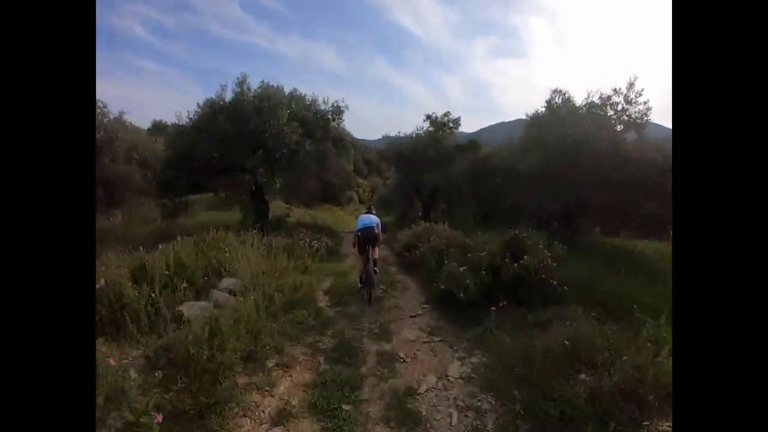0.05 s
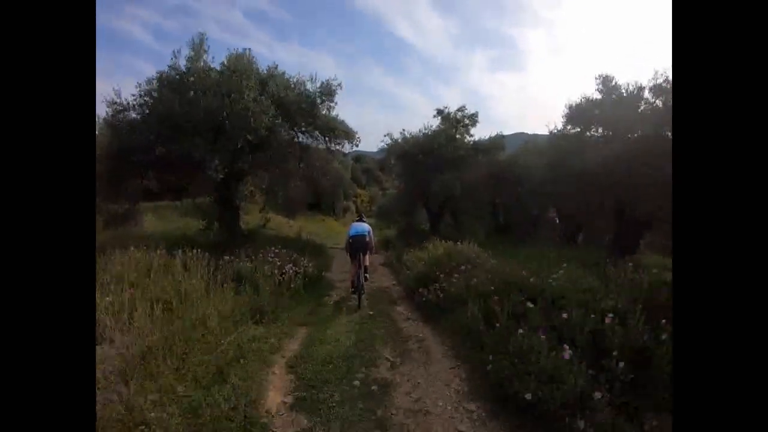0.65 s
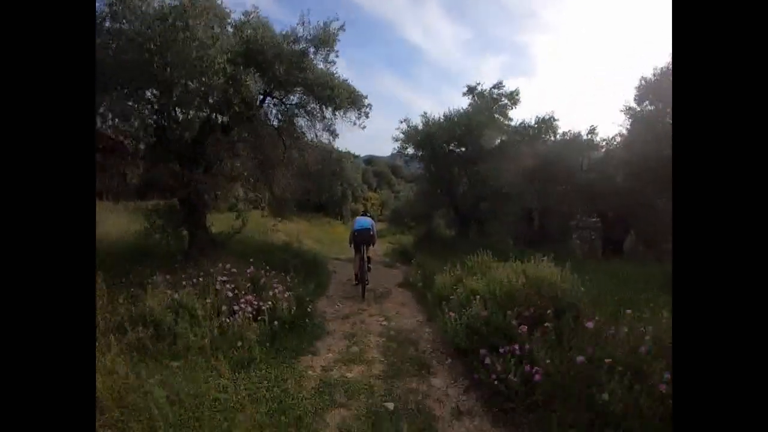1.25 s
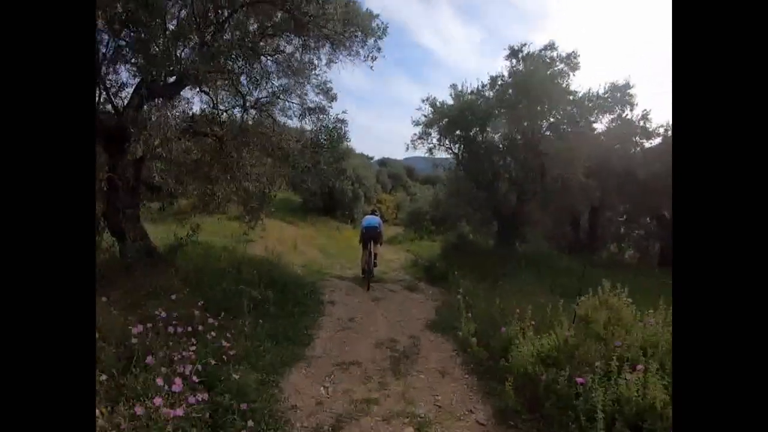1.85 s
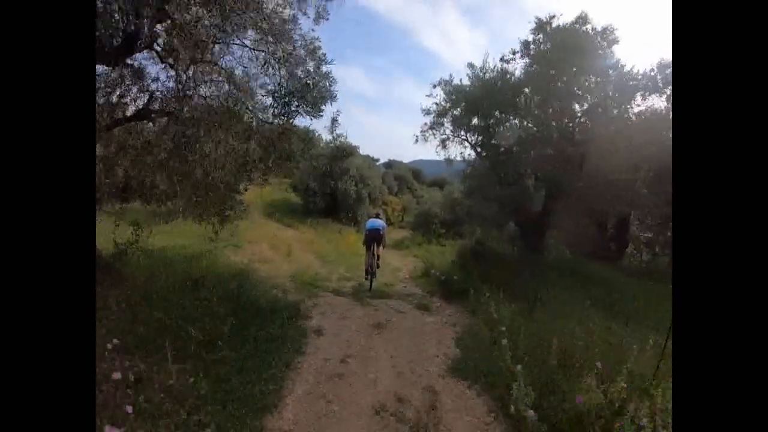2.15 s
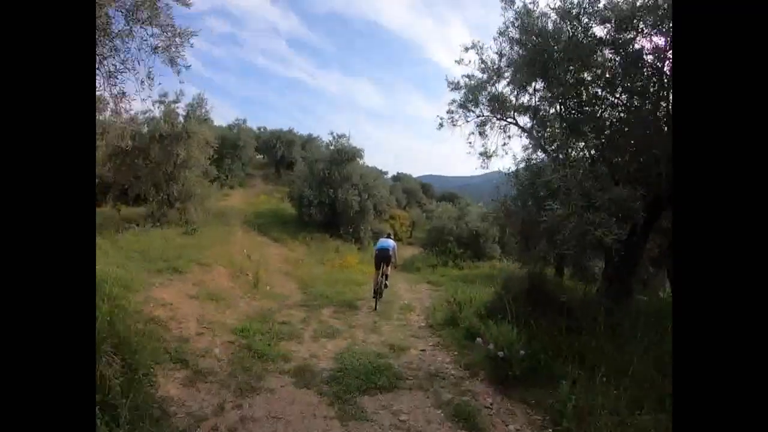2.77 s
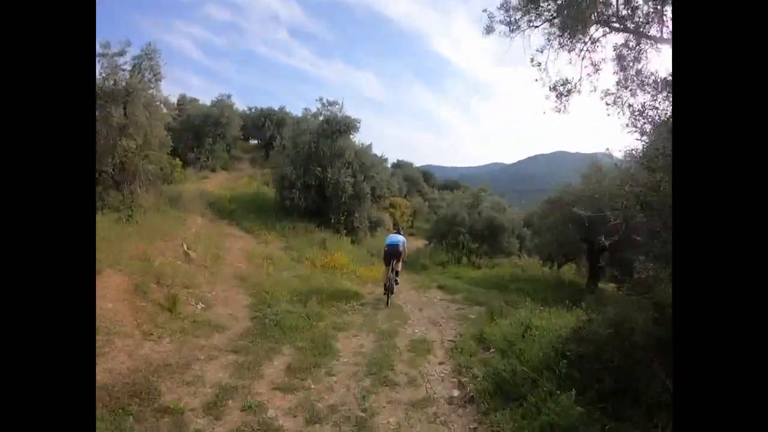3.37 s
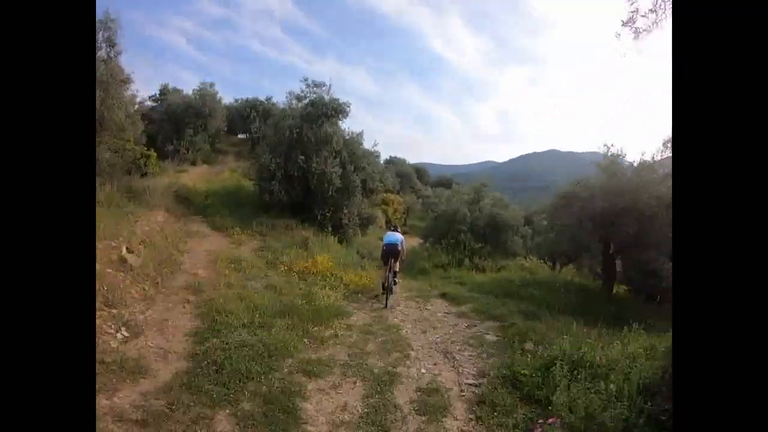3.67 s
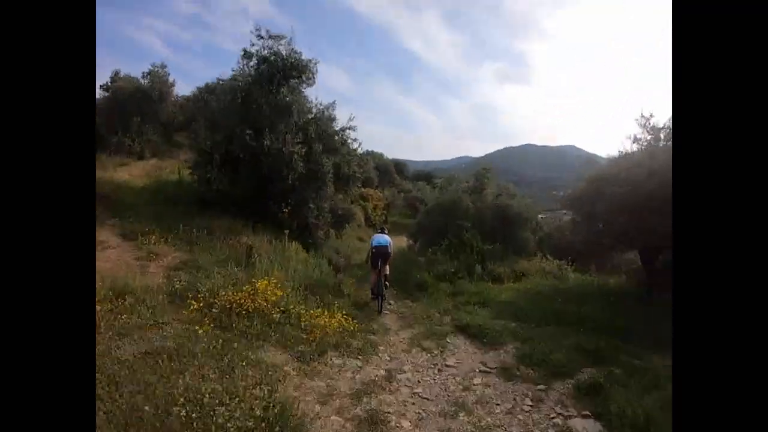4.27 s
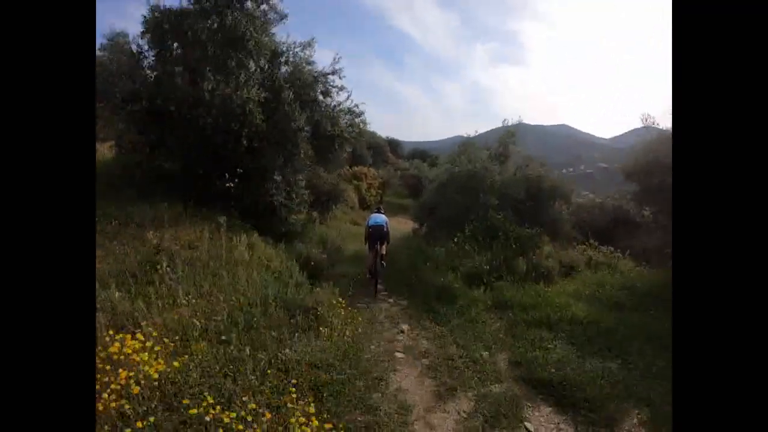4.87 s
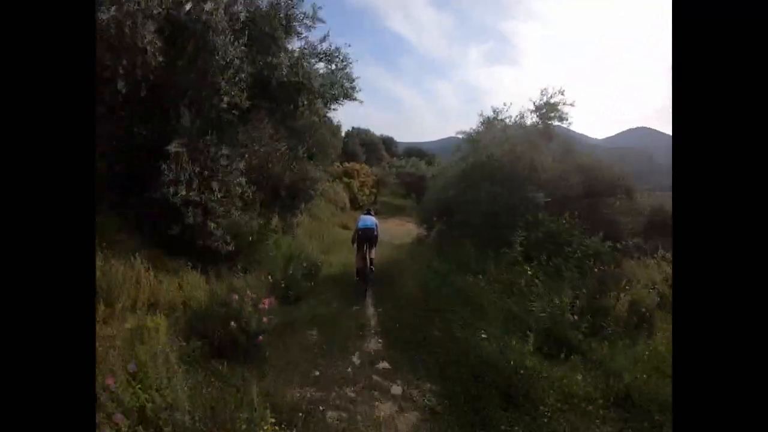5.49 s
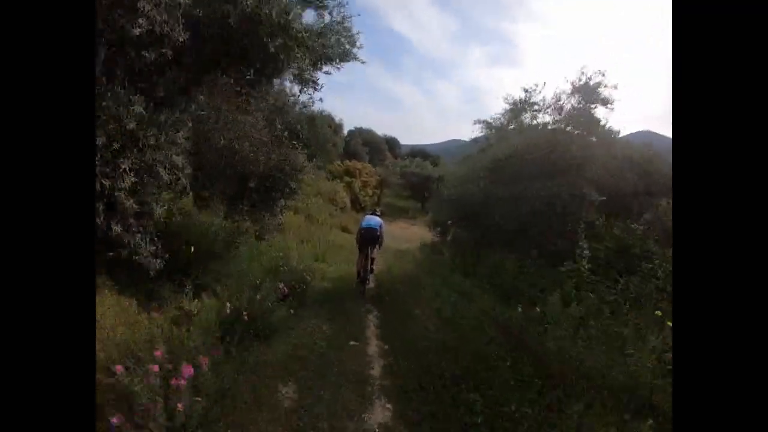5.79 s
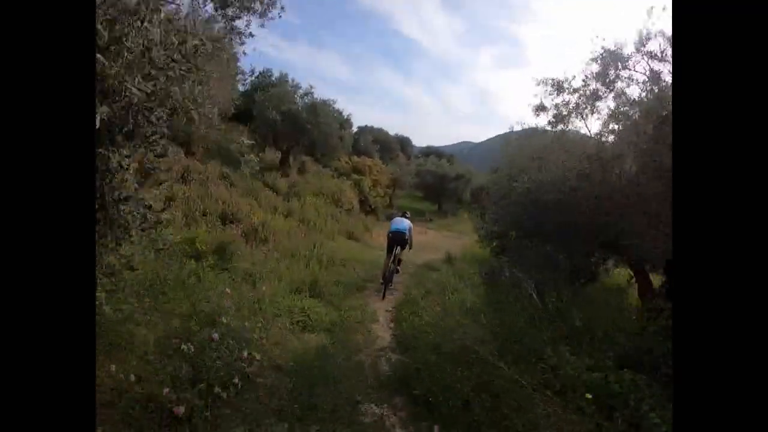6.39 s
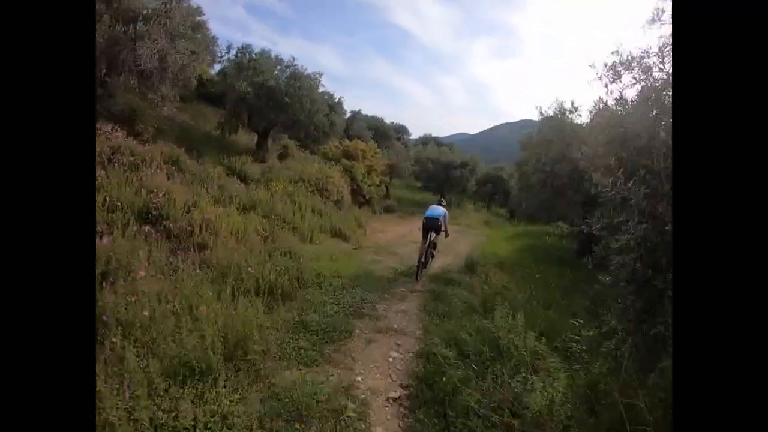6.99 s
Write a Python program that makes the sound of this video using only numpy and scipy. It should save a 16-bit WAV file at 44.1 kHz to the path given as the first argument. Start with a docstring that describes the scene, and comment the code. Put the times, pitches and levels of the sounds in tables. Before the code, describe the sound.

Wind buffets the microphone as bicycle tyres crunch through grit and thud on stones, with sharp knocks from the frame.

```python
"""On a stony dirt track, a rolling bicycle is heard from the rider's seat.
The tyres crunch over grit and thud on stones, spraying gravel; loose parts tick against the frame.
The chain whirrs thinly, the freewheel's pawls buzz briefly, and grass brushes the wheels where the
track narrows. Wind buffets the microphone all the way, a low rumble with a flutter on top."""
import sys
import numpy as np
from scipy import signal
from scipy.fft import rfft, irfft
from scipy.io import wavfile
from scipy.ndimage import uniform_filter1d

SR = 44100
rng = np.random.default_rng(int(sys.argv[2]) if len(sys.argv) > 2 else 0)


def generate_wav(sig):
    """Save sig (samples, or channels by samples) to the path in sys.argv[1] as 16-bit PCM at SR."""
    pcm = np.round(np.clip(np.atleast_2d(sig).T, -1, 1) * 32767).astype(np.int16)
    wavfile.write(sys.argv[1], SR, pcm)


N = 319195
TIME = np.arange(N) / SR

# tyre crunch, louder on stony ground and softer on grass (time [s], level [dB])
CRUNCH_FADER = [(0, -65), (0.25, -67), (0.85, -68), (1.15, -72.5), (1.43, -66.5), (1.82, -70), (2.22, -64),
                (2.55, -66), (2.78, -68.5), (2.97, -66), (3.55, -66.5), (4.22, -66), (4.9, -66.5),
                (5.3, -67.5), (5.78, -64.5), (6.15, -68.5), (6.75, -65), (7.02, -69)]
# hits on large stones (time [s], thud level [dB], spray level [dB], length [s])
BIG_STONES = [(0.476, -59, -53.5, 0.028), (0.524, -52.5, -61.5, 0.021), (1.434, -50, -60.5, 0.021),
              (1.56, -47.5, -71, 0.011), (1.617, -51.5, -56, 0.023), (2.128, -60, -70, 0.033),
              (2.233, -54, -54, 0.02), (2.268, -49, -60, 0.024), (2.326, -50, -58.5, 0.025),
              (2.451, -44, -56.5, 0.025), (2.5, -47.5, -72, 0.06), (2.578, -50, -80, 0.033),
              (3.069, -47.5, -68, 0.017), (3.174, -49.5, -53.5, 0.03), (3.275, -51, -57.5, 0.019),
              (3.338, -60, -56.5, 0.016), (3.372, -51.5, -66, 0.022), (3.409, -48, -53.5, 0.028),
              (3.589, -52, -61, 0.037), (3.661, -45, -53, 0.045), (3.883, -50, -55, 0.048),
              (3.968, -61, -62, 0.024), (4.018, -50, -59.5, 0.017), (4.2, -52, -59, 0.012),
              (4.221, -49.5, -55, 0.037), (4.424, -54, -60.5, 0.049), (4.783, -47, -55.5, 0.031),
              (4.833, -46.5, -54, 0.03), (4.883, -45.5, -54, 0.022), (5.064, -47, -58, 0.028),
              (5.133, -53, -56.5, 0.017), (5.724, -53, -74, 0.014), (5.749, -44.5, -51, 0.031),
              (5.801, -51, -59.5, 0.025), (5.859, -48.5, -54, 0.032), (5.921, -52, -68, 0.018),
              (6.022, -41.5, -50.5, 0.02), (6.095, -44, -49, 0.023), (6.239, -47.5, -54, 0.023),
              (6.304, -51, -57, 0.025), (6.526, -63, -55, 0.027), (6.594, -45.5, -53.5, 0.023),
              (6.66, -52, -63, 0.024)]
# stones and loose parts on the frame (time [s], level [dB], pitch [Hz], relative frame ring [dB])
FRAME_KNOCKS = [(0.041, -38.5, 1560, -14.5), (0.058, -43.5, 2020, -14), (0.286, -39, 2110, -18),
                (0.339, -47, 1860, -13), (0.444, -49.5, 1900, -14), (0.731, -40.5, 1550, -13.5),
                (0.803, -43.5, 2020, -19), (1.019, -43.5, 1280, -35), (1.067, -45, 1980, -16),
                (1.433, -47, 1410, -26), (1.616, -43.5, 1700, -22), (1.811, -43.5, 1800, -24),
                (1.971, -36, 1710, -37), (2.057, -46.5, 1570, -6.5), (2.104, -48, 1510, -24),
                (2.155, -48.5, 2090, -15), (2.341, -43, 1700, -15), (2.389, -45, 1320, -23),
                (2.939, -42.5, 2440, -29), (3.011, -45, 1900, -29), (3.036, -44, 1090, -30),
                (3.155, -49, 1400, -29), (3.194, -49, 1900, -24), (3.373, -38.5, 1780, -25),
                (3.503, -51, 1960, -10), (3.59, -44, 1500, -24), (3.701, -41, 1720, -23.5),
                (3.889, -42, 1860, -19), (3.941, -36.5, 1560, -33), (4.068, -45, 2380, -19),
                (4.206, -33.5, 1350, -29), (4.232, -38, 1980, -27), (4.5, -38, 1510, -13.5),
                (4.56, -41.5, 1960, -18), (4.8, -43, 2300, -28), (4.834, -43, 1420, -22),
                (4.931, -47.5, 1900, -21), (4.959, -41.5, 2500, -16), (4.982, -34, 1240, -25),
                (5.071, -35, 1610, -26), (5.137, -40, 1850, -23), (5.333, -42.5, 1500, -21),
                (5.426, -46, 1540, -11), (5.751, -47, 1200, -18), (5.871, -44, 1160, -22),
                (5.994, -41.5, 2260, -18.5), (6.029, -48, 1600, -11), (6.103, -51, 1690, -22),
                (6.524, -46, 970, -25), (6.68, -29, 980, -41), (6.752, -40, 2080, -36)]
# bright cracks of grit and dry stalks (time [s], level [dB])
SNAP_CUES = [(0.49, -69), (1.334, -66), (3.884, -63), (5.068, -65), (5.137, -63), (5.681, -61.5),
             (6.273, -56), (6.556, -56), (6.679, -62)]
# the rider stops pedalling (time [s], length [s], click rate [1/s], level [dB])
FREEWHEEL_CUES = [(0.113, 0.16, 357, -55.5), (0.44, 0.046, 410, -61)]
# grass against the wheels (time [s], length [s], level [dB])
GRASS_CUES = [(0.0, 0.11, -66.5), (2.56, 0.05, -71), (3.872, 0.044, -69), (5.868, 0.061, -66),
              (6.094, 0.064, -67), (6.262, 0.15, -67), (6.545, 0.14, -68), (6.838, 0.039, -61)]
# whirr of the chain (time [s], level [dB])
CHAIN_FADER = [(0.0, -70.5), (0.8, -76.5), (1.15, -69), (2.1, -69.5), (2.7, -74.5), (6.9, -74.5),
               (7.24, -69)]
# faint, airy high hiss (time [s], level [dB])
HIGH_HISS_FADER = [(0, -90), (1, -96), (2.4, -86.5), (2.8, -91.5), (4.1, -88.5), (4.6, -95.5), (5.3, -93),
                   (6.6, -85.5), (7.24, -88.5)]
# bed of moving air (time [s], large eddies [dB], small eddies [dB])
WIND_FADER = [(0, -50, -56.5), (0.6, -54.5, -57), (1.15, -57, -60.5), (1.75, -58.5, -57), (2.05, -52, -51),
              (2.85, -56.5, -63), (3.45, -55, -52), (4.75, -51.5, -55), (5.5, -50, -58.5),
              (6.5, -52.5, -54), (7.24, -54.5, -59)]
# gusts over that bed (time [s], length [s], large eddies [dB], small eddies [dB])
GUST_CUES = [(0.146, 0.13, -44.5, -45.5), (0.275, 0.049, -52, -42), (0.46, 0.047, -48.5, -51.5),
             (0.69, 0.1, -47.5, -47.5), (0.82, 0.085, -54, -48), (0.935, 0.059, -52, -48),
             (1.075, 0.13, -53, -63), (1.238, 0.062, -50, -57.5), (1.348, 0.048, -47.5, -45.5),
             (2.084, 0.05, -46, -53), (2.382, 0.035, -48, -49.5), (2.664, 0.072, -47.5, -54),
             (2.94, 0.068, -48, -51.5), (3.086, 0.036, -54, -66), (3.315, 0.04, -46.5, -56),
             (3.747, 0.04, -49, -61), (3.946, 0.028, -46, -53), (4.192, 0.18, -46.5, -47),
             (4.428, 0.046, -58, -50.5), (4.558, 0.026, -46, -47), (4.874, 0.099, -46, -49.5),
             (5.03, 0.079, -45, -45), (5.147, 0.12, -45.5, -47), (5.344, 0.03, -49, -71),
             (5.724, 0.064, -51, -69), (5.875, 0.05, -53, -56), (6.334, 0.049, -41, -48),
             (6.486, 0.046, -47, -52.5), (6.714, 0.19, -45.5, -50.5)]

# resonances of the bicycle's parts (pitch [Hz], relative level [dB], 60 dB decay time [s])
TYRE_MODES = [(473, 5, 0.026), (551, 5, 0.031), (724, -1.5, 0.056)]
FITTING_MODES = [(1030, -3, 0.079), (1970, 2, 0.046), (2337, 2, 0.076), (2550, -2, 0.067)]
FRAME_MODES = [(1556, 6, 0.021), (1854, 13, 0.018), (2560, 7.5, 0.014)]
RIM_MODES = [(687, 7, 0.11), (981, 5.5, 0.28), (1159, 6.5, 0.11)]
SPROCKET_MODES = [(4830, 1.5, 0.041), (5890, 0, .035), (6910, 9, 0.011), (9180, 0, 0.011)]

# tone of each layer (frequency [Hz], relative level [dB])
CASING_EQ = [(100, -10), (250, 5.5), (360, -1.5), (470, 4), (600, -0.5), (830, -7), (1020, -5),
             (1300, -9.5), (2200, -28.5), (6000, -50)]  # low-mid body of the tyre
GRIT_EQ = [(300, -6.5), (800, 2.5), (1300, 0), (1900, 4), (3000, -4), (3800, -9), (5000, -17), (6000, -21),
           (9000, -28.5), (10400, -53)]  # midrange crunch
DUST_EQ = [(200, 0), (1000, 7.5), (1500, -9), (3100, -4.5), (4000, -6), (5500, -12), (7200, -16),
           (9300, -30), (12000, -47)]  # soft hiss
SPRAY_EQ = [(300, -2), (800, 2), (1300, 4.5), (2000, 4.5), (2700, -0.5), (3800, -5.5), (4800, -9.5),
            (5600, -24.5), (9000, -26.5), (10200, -49.5)]  # flying gravel
HUB_EQ = [(300, 10), (1050, 1), (1420, 3), (2100, 3), (2500, 5), (2900, 4.5), (3400, -3), (5000, -5.5),
          (8500, -15.5), (10500, -29), (14000, -38)]  # metallic buzz
STALK_EQ = [(800, 0), (2500, -4), (5000, -7), (8500, -12.5), (10500, -22), (13000, -30), (15000, -60)]  # dry, bright rustle
CHAIN_EQ = [(1500, -35.5), (2500, -6.5), (3000, -3), (3300, -6), (3650, -6), (4300, -16), (7000, -33),
            (12000, -72)]  # thin whirr
HIGH_HISS_EQ = [(4000, -9.5), (9200, 0), (9900, -7), (13500, -12), (15000, -19)]  # airy top end
LARGE_EDDY_EQ = [(12, -16.5), (25, -1.5), (45, 0), (75, -2.5), (110, -11.5), (170, -23.5), (280, -36.5),
                 (450, -44.5), (1000, -52), (3000, -86.5)]  # sub rumble
SMALL_EDDY_EQ = [(30, -14), (70, 2), (125, 2.5), (190, 1), (280, -9), (400, -17), (600, -22.5),
                 (1000, -36.5), (3000, -83)]  # bassy flutter
SWIRL_EQ = [(110, -12.5), (240, -1.5), (420, -7.5), (2500, -90)]  # hollow note of hard gusts


def tyre_crunch():
    """Grit cracks in clumps under the tyres and shakes their casings, over a smooth hiss of dust."""
    crunch_db, = curves(CRUNCH_FADER)
    stony_db = crunch_db - crunch_db.mean()
    clumps = wander(rate_hz=38)
    coarse = grains(per_s=900, spread_db=3.5)
    casing_db = -64.5 + 1.8 * stony_db + 2.5 * clumps + 3.57 * wander(rate_hz=31)
    casing = colour(coarse, CASING_EQ) * amp(casing_db)
    fine = grains(per_s=3000, spread_db=1.5)
    grit = colour(unit(fine + 0.31 * coarse), GRIT_EQ) * amp(crunch_db + 3.43 * clumps)
    dust = noise(DUST_EQ) * amp(-71.5 + 0.28 * stony_db + 0.71 * clumps)
    return casing + grit + dust


def stone_jolts(small_per_s=1.5, pieces=4, shudder_db=-5, clack_db=13, rattle_db=-11):
    """A stone rings the tyre and squirts gravel aside; larger pieces clack and the fittings rattle."""
    t = np.arange(SR // 6) / SR
    crackle = grains(per_s=1700, spread_db=3)
    crunch_db, = curves(CRUNCH_FADER)
    # small stones come by chance, their levels riding on the crunch
    places = (N * rng.random(int(small_per_s * N / SR))).astype(int)
    small_stones = [(at / SR, crunch_db[at] + 1, crunch_db[at] + 5.5, 0.01) for at in places]
    stones = list(BIG_STONES) + small_stones
    chances = rng.random((len(stones), pieces + 1, 2))
    attack = 1 - np.exp(-t / 0.0012)
    hits, shudder, spray = np.zeros((3, N))
    for (s, thud_db, spray_db, length), chance in zip(stones, chances):
        tuning = 1 + 0.07 * (2 * chance[0, 0] - 1)
        add(hits, s, amp(thud_db) * attack * ring(TYRE_MODES, t, tuning))
        contact = attack * np.exp(-(t / length) ** 2)
        add(shudder, s, amp(thud_db + shudder_db) * contact)
        add(spray, s, amp(spray_db - 2.5) * contact)
        for lag, pitch in chance[1:]:
            add(hits, s + lag * length, amp(spray_db + clack_db - 3.9 * lag) * clack(1300 * 3 ** pitch))
    gravel = spray * crackle
    metal = ring(FITTING_MODES, t)
    rattle = amp(rattle_db) * signal.oaconvolve(gravel, metal / np.linalg.norm(metal))[:N]
    return hits + colour(shudder * crackle, CASING_EQ) + colour(gravel, SPRAY_EQ) + rattle


def frame_knocks():
    """A tick of about one cycle; the frame answers with a ring, deeper for dull blows, and chatters."""
    t = np.arange(SR // 16) / SR
    hits, chatter = np.zeros((2, N))
    detunes = 0.05 * rng.uniform(-0.67, 1, len(FRAME_KNOCKS))
    for (s, db, hz, ring_db), detune in zip(FRAME_KNOCKS, detunes):
        cycles = (t - 0.003) * hz  # the tick is centred 3 ms in
        tick = np.sin(2 * np.pi * cycles) / np.cosh(np.minimum(abs(cycles) / 0.33, 50))
        add(hits, s - 0.0022, amp(db) * tick)
        tuning = min(hz / FRAME_MODES[0][0], 1) + detune
        frame = np.tanh(t / 0.0003) ** 2 * ring(FRAME_MODES, t, tuning)
        add(hits, s + 0.001647, amp(db + ring_db) * frame)
        # dull blows reach the rim best, and the shaking wheel roughens its ring
        rim_db = db - 32.5 - 8.1 * np.log2(hz / RIM_MODES[1][0])
        shake = 1 + unit(uniform_filter1d(rng.standard_normal(len(t)), size=130))
        add(hits, s + 0.00201, amp(rim_db) * np.tanh(t / 0.0026) * ring(RIM_MODES, t) * shake)
        add(chatter, s + 0.0015, amp(db - 22) * np.exp(-t / 0.0053))
    chatter *= rng.standard_normal(N)
    return hits + 1.77 * colour(chatter, GRIT_EQ) + 2.5 * colour(chatter, CASING_EQ)


def pebbles(per_s=90):
    """Pebbles pop from under the tread, each at its own pitch."""
    crunch_db, = curves(CRUNCH_FADER)
    pops = np.zeros(N)
    for when, pitch, size in rng.random((int(per_s * N / SR), 3)):
        at = int(when * N)
        add(pops, at / SR, amp(crunch_db[at] + 17.5 * size ** 3) * clack(900 * 4 ** pitch))
    return pops


def clack(hz):
    """A small stone rings for a few cycles."""
    cycles = hz * np.arange(SR // 80) / SR
    return np.sin(2 * np.pi * cycles) * np.exp(-cycles / 1.43) * np.tanh(2 * cycles) ** 2


def snaps(decay_s=0.0041):
    """Bits of grit and dry stalk crack brightly."""
    t = np.arange(SR // 40) / SR
    bursts = np.zeros(N)
    for s, db in SNAP_CUES:
        add(bursts, s, amp(db) * np.exp(-t / decay_s))
    return colour(bursts * rng.standard_normal(N), STALK_EQ)


def freewheel(harmonics=36):
    """Pawls drop into the ratchet fast enough to sing; the hub smears their clicks into a raspy buzz."""
    buzz = np.zeros(N)
    for s, length, rate, db in FREEWHEEL_CUES:
        span = (TIME > s) & (TIME < s + 0.4)
        teeth = (rate * TIME + 0.008 * wander(rate_hz=130) + 0.03 * wander(rate_hz=20))[span]
        # the shaking wheel keeps shifting which overtones ring out
        sway = unit(smooth(rng.standard_normal((harmonics, SR // 2)), size=900))[:, :len(teeth)]
        gains = amp(4 * np.tanh(sway))
        phases = rng.random(harmonics)
        tone = sum(gains[k] * np.cos(2 * np.pi * ((k + 1) * teeth + phases[k])) for k in range(harmonics))
        rasp = np.exp(-(teeth % 1) / 0.46) * rng.standard_normal(N)[span]
        envelope = amp(db) * swell(s, length, rise_s=0.065, fall_s=0.041)[span]
        buzz[span] += (0.82 * unit(tone) + 0.5 * unit(rasp)) * envelope
    return colour(buzz, HUB_EQ)


def grass():
    """Stalks whip past the spokes in quick, fading strokes."""
    strokes = np.zeros(N)
    for s, length, db in GRASS_CUES:
        age = np.maximum(TIME - s, 0) * 4 / length  # the stroke peaks at age 1
        strokes += amp(db) * age * np.exp(1 - age)
    return colour(strokes * grains(per_s=7000, spread_db=4.5), STALK_EQ)


def chain(links_per_s=55, sheen_db=-90):
    """Links seat softly and unevenly on the sprockets in a thin whirr, and keep them faintly ringing."""
    level_db, = curves(CHAIN_FADER)
    pace = np.maximum(1 + 0.11 * wander(rate_hz=4) + 0.35 * wander(rate_hz=60), 0.1)
    links = np.cumsum(links_per_s * pace) / SR
    force = amp(3.5 * np.clip(rng.standard_normal(N), -2, 1.5))[links.astype(int)]  # one value a link
    pulses = 0.24 + force * np.exp(-(links % 1) / 0.17)
    seating = unit(pulses * rng.standard_normal(N))
    whirr = colour(seating * amp(level_db), CHAIN_EQ)
    sprocket = ring(SPROCKET_MODES, np.arange(SR // 8) / SR)
    sheen = unit(signal.oaconvolve(seating, sprocket)[:N])
    return whirr + sheen * amp(sheen_db + 2.3 * wander(rate_hz=6.4))


def wind(swirl_db=-9.5, swirl_onset_db=-44):
    """Large eddies rumble on the microphone, small ones flutter; hard gusts break into a hollow swirl."""
    bed_large_db, bed_small_db = curves(WIND_FADER)
    large = amp(bed_large_db + 2 * wander(rate_hz=6.2))
    small = amp(bed_small_db + 3 * wander(rate_hz=22))
    for s, length, large_db, small_db in GUST_CUES:
        gust = swell(s, length, rise_s=0.019, fall_s=0.012)
        large = np.hypot(large, amp(large_db) * gust)
        small = np.hypot(small, amp(small_db) * gust)
    rumble = steady(noise(LARGE_EDDY_EQ), span_s=0.07)
    flutter = steady(noise(SMALL_EDDY_EQ), span_s=0.045)
    swirl = noise(SWIRL_EQ) * amp(swirl_db) * np.tanh((small / amp(swirl_onset_db)) ** 2)
    return rumble * large + (flutter + swirl) * small


def high_hiss():
    """A faint, airy high hiss slowly swells and fades."""
    level_db, = curves(HIGH_HISS_FADER)
    return noise(HIGH_HISS_EQ) * amp(level_db)


def amp(db):
    """Decibels to gain."""
    return 10 ** (np.asarray(db) / 20)


def unit(x):
    """Scales to rms 1."""
    return x / np.sqrt(np.mean(x ** 2) + 1e-20)


def curves(rows):
    """Each level column of a fader table, sample by sample."""
    s, *columns = np.transpose(rows)
    return [np.interp(TIME, s, c) for c in columns]


def add(mix, s, sound):
    """Mixes a sound in at time s."""
    part = mix[max(round(s * SR), 0):][:len(sound)]
    part += sound[:len(part)]


def colour(x, eq, size=8192):
    """Minimum-phase EQ of unit energy, so clicks keep their sharp attacks."""
    hz, db = np.transpose(eq)
    log_bins = np.log(abs(np.fft.fftfreq(size, 1 / SR)) + 1)
    log_gain = np.log(amp(np.interp(log_bins, np.log(hz), db)))
    response = np.exp(np.conj(signal.hilbert(log_gain)))
    taps = np.fft.ifft(response).real[:size // 2]
    return signal.oaconvolve(x, taps / np.linalg.norm(taps))[:N]


def noise(eq):
    """White noise through an EQ."""
    return colour(rng.standard_normal(N), eq)


def wander(rate_hz):
    """Random modulation of rms 1, rolled off above rate_hz."""
    hz = np.fft.rfftfreq(N, 1 / SR)
    return unit(irfft(rfft(rng.standard_normal(N)) / (1 + (hz / rate_hz) ** 4), N))


def grains(per_s, spread_db):
    """Random clicks, many small and a few large."""
    sizes = amp(spread_db * np.minimum(rng.exponential(1, N), 4))
    return unit(sizes * rng.choice([-1, 1], N) * (rng.random(N) < per_s / SR))


def smooth(x, size):
    """Two moving averages of size samples."""
    return uniform_filter1d(uniform_filter1d(x, size), size)


def steady(x, span_s):
    """Levels the slow swells out of a noise."""
    return x / np.sqrt(abs(smooth(x ** 2, int(span_s * SR))) + 1e-12)


def ring(modes, t, tuning=1):
    """Dying sines of a struck body."""
    return sum(amp(db - 60 * t / t60) * np.sin(2 * np.pi * hz * tuning * t) for hz, db, t60 in modes)


def swell(s, length, rise_s, fall_s):
    """Envelope that rises from time s and is released at s + length."""
    return np.clip((TIME - s) / rise_s, 0, 1) * np.exp(-np.maximum(TIME - s - length, 0) / fall_s)


def scene():
    """A mono mix, everything close and dry in the open air."""
    bed = wind() + tyre_crunch() + high_hiss()
    impacts = pebbles() + stone_jolts() + frame_knocks() + snaps()
    return (bed + impacts + freewheel() + chain() + grass())[None]


def record(dry):
    """A steep high cut at 14.6 kHz."""
    high_cut = signal.firwin(511, 14600, window=("kaiser", 9), fs=SR)
    return signal.oaconvolve(dry, high_cut[None], "same")


dry = scene()
out = record(dry)
generate_wav(out)
```